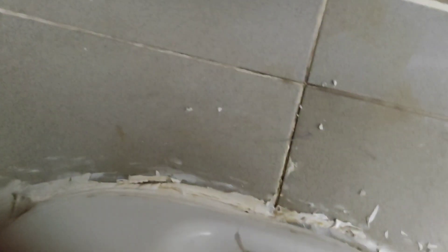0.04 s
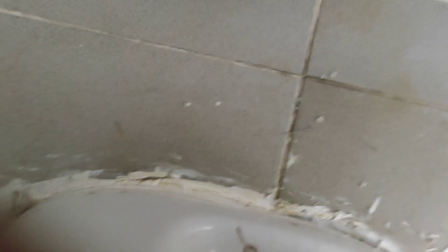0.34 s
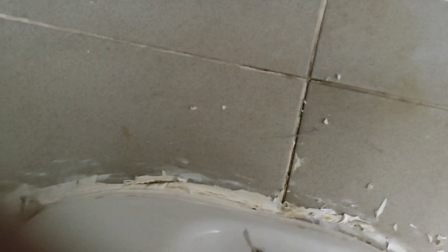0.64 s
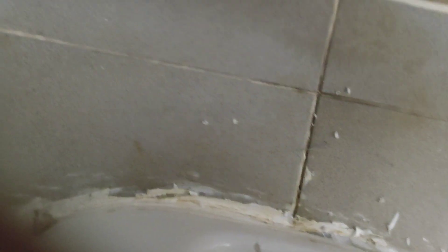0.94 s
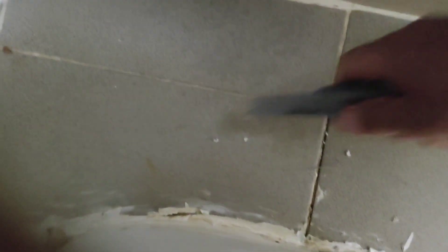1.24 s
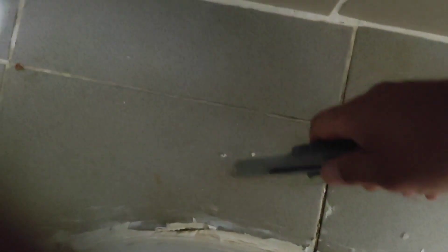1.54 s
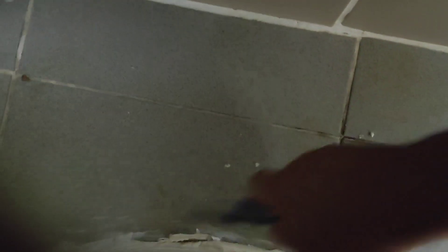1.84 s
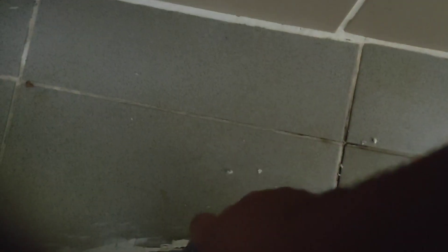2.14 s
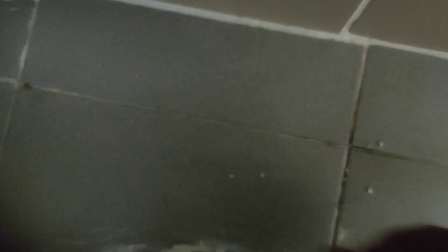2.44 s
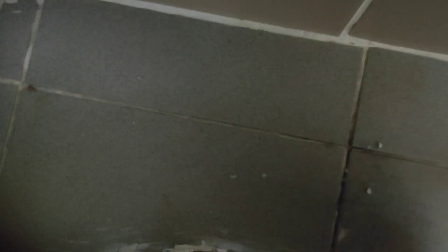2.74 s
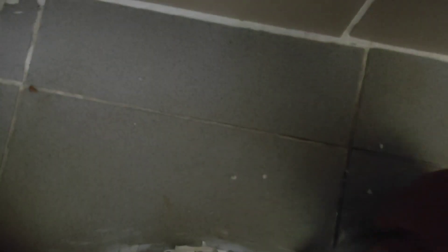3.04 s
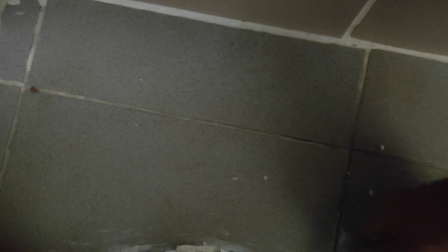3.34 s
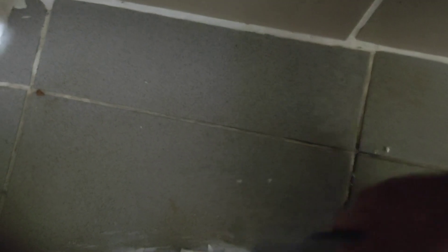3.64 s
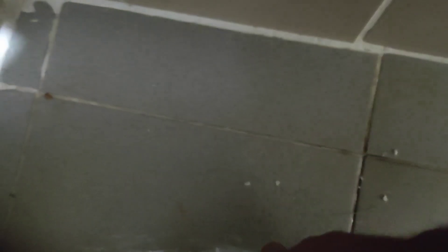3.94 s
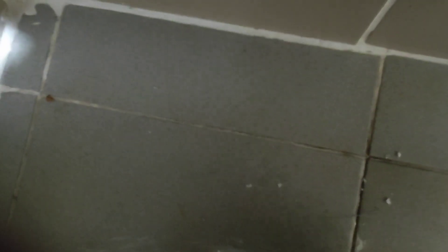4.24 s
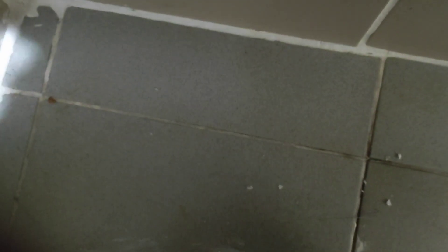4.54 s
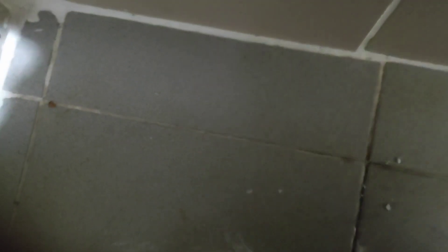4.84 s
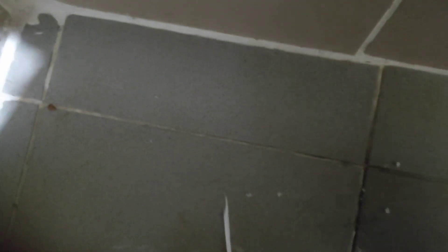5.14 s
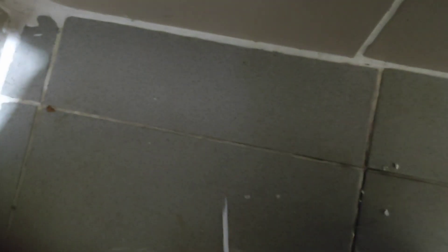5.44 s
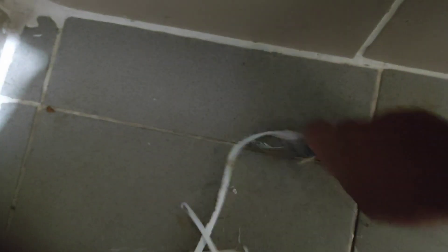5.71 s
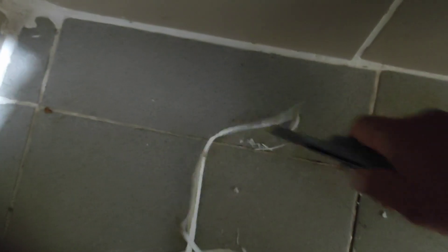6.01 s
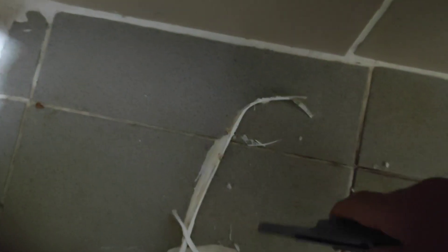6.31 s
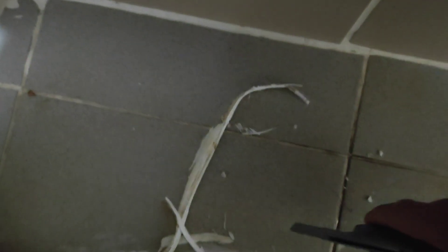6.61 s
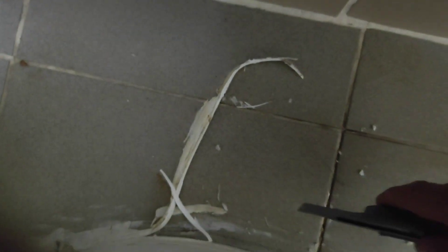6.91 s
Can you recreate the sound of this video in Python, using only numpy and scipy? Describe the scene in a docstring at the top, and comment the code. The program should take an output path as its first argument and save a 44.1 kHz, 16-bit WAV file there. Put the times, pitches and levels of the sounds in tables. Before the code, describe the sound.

Close up in a small tiled bathroom, light ticks and soft scratching grow into irregular, high, raspy scrapes as a metal blade works at old sealant. The blade snags and taps on the tile, now and then squeaking briefly, with some soft low bumps and a faint sleeve rustle. The strokes get busier, peak in three quick, forceful scrapes, then drop to light scratches over quiet room air.

```python
"""A small, hard, tiled bathroom: close to a stereo camera, a steel blade scrapes old sealant off the floor.
In each stroke the edge sticks and slips: it hisses, rasps under pressure and at times squeaks.
In between it catches, jabs and knocks on the tile, among tiny ticks and dull bumps on the floor.
The microphone's resonance colours the hiss near 7.5 kHz. The walls add a short, bright tail;
underneath sit a thin whistle, sleeve rustle, room air and faint hum."""
import sys
import numpy as np
from scipy import signal
from scipy.fft import rfft, irfft, next_fast_len
from scipy.io import wavfile
from scipy.ndimage import uniform_filter1d

SR = 44100
rng = np.random.default_rng(int(sys.argv[2]) if len(sys.argv) > 2 else 0)


def transcribe(u):
    """Save the signal u as a 16-bit wav file named by the first command-line argument.

    u: samples, shape (n,) or (channels, n), limited to [-1, 1]; the rate is SR.
    q: integer samples, one column per channel.
    """
    v = np.clip(np.atleast_2d(u).T, -1, 1)
    q = np.round(v * 32767).astype(np.int16)
    wavfile.write(sys.argv[1], SR, q)


N = 307377

# Left-right likeness of a stroke, a catch and the background: freq_hz, correlation (-1..1)
STROKE_STEREO = [(200, 0.37), (900, 0.01), (5000, -0.11), (6200, 0.4), (7000, 0.95), (8500, 0.97),
                 (11000, .4)]
CATCH_STEREO = [(900, 0.1), (5000, -0.2), (7500, 0.5), (11000, 0.5)]
AIR_STEREO = [(100, 0.92), (500, 0.44), (2000, 0.29), (7500, 0.93)]
# Colour of the ringing steel: freq_hz, density_db
STEEL_COLOUR = [(900, -39), (1400, -18), (2100, 0.5), (2900, 1), (3700, 0), (4500, -1), (5500, 0),
                (6500, -4.5), (9000, -23.5)]


def blade(neutral_hz=7488, crack_db=-18.3):
    """Strokes and catches shake the same steel and tile; a breaking contact adds a bright crack."""
    # The scrape drifts slightly in pitch: time_s, hiss_peak_hz
    hiss_pitch = [(1.7, 7540), (2.26, 7750), (2.35, 7440), (3.73, 7690), (4.12, 7403), (4.3, 7250),
                  (4.49, 7601), (4.6, 7230), (4.66, 7520), (4.95, 7170), (5.08, 7570), (5.8, 7632)]
    crack_colour = [(7000, -24.5), (9500, 4), (15500, -7.5)]  # freq_hz, density_db
    hiss, rasp, rub, drag = scraping()
    snap, chatter, knock, crack = catches()
    stretch = curves(hiss_pitch)[0] / neutral_hz
    top = scraping_hiss(hiss, snap, stretch)
    body = steel_and_tile(rasp, rub, np.hypot(drag, knock), stretch)
    biting = bite(rasp)
    clink = chatter * noise(STEEL_COLOUR, CATCH_STEREO, patchy_db=3)
    return top + body + biting + clink + amp(crack_db) * crack * noise(crack_colour, CATCH_STEREO)


def strokes(swell_db=13.5, release_db_per_s=280.5):
    """Hiss, grate and drag envelopes: in each stroke the hand leans in, holds the push and lets go."""
    # Blade strokes, plus faint background hiss near the start and end (the rows at 0, .64 and 6.2 s):
    # start_s, swell_s, hold_end_s, hiss_db, grate_db, drag_db
    cues = [(0, .017, .5, -67, -71, -69), (.115, .008, .145, -53, -51, -62),
            (.55, .028, 0.6, -59.5, -63.5, -73), (.64, .14, .95, -61, -65, -65),
            (1.1, .11, 1.67, -47.5, -56, -66), (1.6, .15, 2.02, -38, -48, -58),
            (2.03, .03, 2.24, -46.5, -53, -62.5), (2.26, .01, 2.4, -41, -42, -44.5),
            (2.291, .11, 2.565, -26.5, -34, -39.5), (2.64, .018, 2.78, -49, -51, -59),
            (2.99, .012, 3.02, -38, -36, -58), (3.04, .05, 3.1, -31, -35.5, -58.5),
            (3.38, .052, 3.42, -38.5, -39, -56), (3.63, .041, 3.69, -48, -47.5, -69),
            (3.78, .021, 3.97, -44, -50, -65), (4.008, .015, 4.045, -35, -35, -53),
            (4.055, .02, 4.078, -26.5, -31.5, -51), (4.1, .12, 4.285, -19.5, -28, -38),
            (4.36, .02, 4.44, -37.5, -32.5, -41), (4.521, .08, 4.7, -23, -30, -39.5),
            (4.77, .11, 4.964, -28.5, -34, -44.5), (4.9, .038, 4.92, -25.5, -36, -44),
            (4.942, .012, 4.98, -20.5, -33, -43), (4.99, .009, 5.015, -32.5, -37, -46),
            (5.094, .014, 5.17, -33.5, -32.5, -53), (5.215, .02, 5.28, -37.5, -42.5, -58),
            (5.32, .017, 5.5, -41.5, -45, -43.5), (5.437, .014, 5.51, -17.5, -19.5, -42),
            (5.508, .024, 5.6, -16.5, -21.5, -42), (5.605, .018, 5.712, -17.5, -22.5, -38),
            (6.02, .018, 6.1, -55, -64, -75), (6.2, .02, 6.6, -64, -69.5, -74),
            (6.6, .045, 6.6, -55, -58.5, -75)]
    t, power = np.arange(SR) / SR, np.zeros((3, N))
    for start, swell, end, *levels in cues:
        attack_db = swell_db * (np.clip(t / swell, 0, 1) - 1)
        release_db = release_db_per_s * np.maximum(t - (end - start), 0)
        add(power, start, np.outer(amp(levels), amp(attack_db - release_db)) ** 2)
    return np.sqrt(power)


def scraping(slips_per_s=780, slip_t60=.016, sliding=2.2, crumbs_per_s=30, crumb_t60=.012, bite_db=-25):
    """Hiss, rasp, rub and drag envelopes: the edge sticks and slips as the hand judders along the bead."""
    t = np.arange(SR // 50) / SR
    jolts = (rng.random(N) < slips_per_s / SR) * amp(2.2 * rng.standard_normal(N))
    slips = unit(signal.oaconvolve(jolts, fade(t, slip_t60))[:N])
    hand = amp(.9 * wobble(70) + .6 * wobble(22))  # quick judder, slow sway
    # now and then a hard crumb of sealant gives way with a sharper slip
    breaks = (rng.random(N) < crumbs_per_s / SR) * amp(1) * rng.random(N)
    crumbs = signal.oaconvolve(breaks, fade(t, crumb_t60))[:N]
    grain = amp(.34) * unit((slips + sliding) * hand) * unit(np.hypot(1, crumbs))
    hiss, grate, drag = strokes()
    # a light stroke only rubs; under pressure the edge bites and the steel rasps brightly
    load = (grate / amp(bite_db)) ** 2
    rub = grate / np.hypot(1, load)
    return grain * np.array([hiss, rub * load, rub, drag])


def catches(rise_s=.0007, stop_t60=.029, ring_db=-9, ring_t60=.097, knock_t60=.088, pivot_db=-28):
    """Snap, chatter, knock and crack envelopes: the blade snags, stops short and rings on weakly."""
    # Snags of the edge: start_s, length_s, snap_db, knock_db
    snags = [(0.961, .005, -27.5, -62), (0.975, 0.018, -22.5, -48), (2.0083, 0.0058, -14.5, -54),
             (2.126, .008, -41, -59), (2.196, .01, -39, -59), (2.24, 0.0095, -29, -50.5),
             (2.2506, 0.0055, -13, -21), (2.615, 0.0055, -12, -24), (2.843, 0.012, -30.5, -60),
             (2.928, 0.004, -28, -65.5), (2.949, 0.02, -37, -65), (2.978, .003, -22, -55),
             (2.9814, 0.0063, -12, -46), (3.22, 0.015, -35.5, -52), (3.318, .012, -44, -54),
             (3.3555, 0.0023, -11, -49), (3.444, 0.0045, -11.5, -38.5), (3.48, 0.012, -20.5, -42.5),
             (3.7656, 0.006, -10.5, -50), (3.928, 0.011, -35.5, -56), (4.019, 0.0065, -36.5, -52),
             (4.1786, 0.0056, -18.5, -50), (4.232, 0.0018, -23, -48), (4.377, 0.005, -27.5, -40),
             (4.4805, 0.0084, -23.5, -32), (4.7216, 0.007, -15, -25), (4.836, .004, -31.5, -44.5),
             (5.099, 0.01, -30.5, -55.5), (5.218, 0.01, -29.5, -54.5), (5.3172, 0.0064, -16, -27),
             (5.342, 0.0051, -30, -30), (5.424, 0.0092, -31, -45.5), (5.437, 0.0025, -22.5, -43.5),
             (5.72, 0.0044, -15, -39), (5.757, 0.005, -27, -57.5), (5.834, 0.004, -20.5, -36.5),
             (5.943, .005, -42, -62), (5.979, 0.016, -31, -56), (6.26, 0.01, -34, -57),
             (6.366, 0.0073, -43.5, -61)]
    t, blows = np.arange(SR // 5) / SR, np.zeros((4, N))
    for start, length, snap_db, knock_db in snags:
        # with force, the chatter grows more slowly than the snap, the crack faster
        force_db = snap_db - pivot_db
        levels = [snap_db, pivot_db + .81 * force_db, knock_db, pivot_db + 1.16 * force_db]
        after = np.maximum(t - length, 0)
        steel = np.maximum(fade(after, stop_t60), amp(ring_db) * fade(after, ring_t60))
        decay = np.array([steel, steel, fade(after, knock_t60), steel])
        add(blows, start, amp(levels)[:, None] * (1 - np.exp(-t / rise_s)) * decay)
    roughness = unit(amp(1.3 * wobble(1500)))
    return amp(-1.48) * blows * roughness


def scraping_hiss(hiss, snap, stretch):
    """The hiss of strokes and catches, coloured by the microphone's resonance near 7.5 kHz."""
    # Colour of the hiss through the microphone: freq_hz, density_db
    colour = [(3000, -41.5), (5500, -19), (6300, -9), (7000, -1), (7500, 1), (8100, -4), (8800, -9),
              (9400, -20), (10200, -25.5), (11300, -27.5), (13500, -38.5), (15500, -34)]
    sliding = hiss * noise(colour, STROKE_STEREO, patchy_db=4, stretch=stretch)
    return sliding + snap * noise(colour, CATCH_STEREO, patchy_db=4, stretch=stretch)


def steel_and_tile(rasp, rub, tile_force, stretch, steel_db=-4):
    """The body of the scrape: biting steel, a light rub and the lower voice of the tile."""
    # Colours of the rub and the tile: freq_hz, density_db
    rub_colour = [(900, -31.5), (1500, -11.5), (2100, 0.5), (2800, 0.5), (3400, -5.5), (5500, -4),
                  (6500, -12.5), (9000, -24.5)]
    tile_colour = [(80, -30), (300, -5.5), (650, -9), (900, 1.5), (1150, -2), (1450, 3), (2000, -6),
                   (4000, -39.5)]
    layers = [(amp(steel_db) * rasp, STEEL_COLOUR), (rub, rub_colour), (tile_force, tile_colour)]
    return sum(force * noise(colour, STROKE_STEREO, patchy_db=5, size=1024, stretch=stretch)
               for force, colour in layers)


def bite(rasp, gain_db=-2, neutral_hz=2200):
    """A biting blade rasps in one broad resonance, which climbs in the hardest push."""
    # Colour of the resonance at its neutral pitch: freq_hz, density_db
    colour = [(900, -40), (1600, -10), (2200, 0.5), (2700, -4), (3600, -12), (6000, -25.5)]
    # Its glide: time_s, peak_hz
    glide = [(3.1, 2750), (4.25, 2130), (4.66, 2140), (5.455, 2400), (5.49, 3200), (5.56, 3570),
             (5.68, 3750)]
    stretch = curves(glide)[0] / neutral_hz
    return amp(gain_db) * rasp * noise(colour, STROKE_STEREO, patchy_db=4, size=1024, stretch=stretch)


def squeaks(unsteady=.022):
    """For a moment the friction locks onto one rough, wandering tone."""
    # Brief notes of the blade: middle_s, half_width_s, pitch_hz, level_db
    notes = [(.14, .02, 4380, -54), (3.098, 0.014, 2850, -30), (3.094, 0.016, 4130, -35),
             (4.66, 0.05, 2077, -30), (5.167, 0.019, 1010, -38.5), (5.468, 0.014, 2200, -23),
             (5.597, 0.01, 3560, -21), (5.655, 0.045, 905, -33.5)]
    t, out = np.arange(SR // 2) / SR, np.zeros((2, N))
    for middle, width, hz, db in notes:
        pitch = hz * (1 + unsteady * np.array([wobble(350, size=len(t)) for side in range(2)]))
        swell = amp(db) * np.exp(-((t - t.mean()) / width) ** 2 / 2)
        add(out, middle - t.mean(), swell * np.sin(2 * np.pi * np.cumsum(pitch, axis=1) / SR))
    return out


def ticks(sweep_hz=3400, end_hz=750, fall_s=.0017, rise_s=.00194, t60=.02):
    """Tiny ticks, each diving in pitch within a few cycles."""
    # Tick cues: start_s, gain_db
    cues = [(0.287, -41), (0.765, -37.5), (0.823, -34), (0.856, -29), (.944, -39), (3.855, -23)]
    t, out = np.arange(SR // 30) / SR, np.zeros(N)
    phase = 2 * np.pi * np.cumsum(end_hz + sweep_hz * np.exp(-t / fall_s)) / SR
    tick = np.sin(phase) * (1 - np.exp(-t / rise_s)) * fade(t, t60)
    for start, db in cues:
        add(out, start, amp(db) * tick)
    return out


def bumps():
    """Soft weight on the floor rings the low modes; a slow push leaves out the short ones."""
    # Modes of the boom: pitch_hz, level_db, t60_s
    modes = [(88, -16, 0.41), (130, -9.5, 0.15), (169.2, -0.5, 0.29), (309, -5.5, 0.1), (528, -4.5, 0.052)]
    # Dull bumps on the floor: start_s, peak_db, rise_s
    cues = [(0.88, -44, 0.053), (1.787, -28, 0.0033), (2.252, -34, .001), (2.617, -37, .001),
            (3.869, -38.5, .06), (4.805, -37.5, 0.036)]
    t, out = np.arange(SR // 2) / SR, np.zeros(N)
    boom = sum(amp(db) * np.sin(2 * np.pi * hz * t) * fade(t, t60) for hz, db, t60 in modes)
    for start, db, rise in cues:
        ring = boom * (1 - np.exp(-t / rise))
        add(out, start, amp(db) * ring / np.abs(ring).max())
    return out


def tiled_walls(x, t60=.32, build_s=.003):
    """The walls answer with a short, bright tail that changes as hand and camera move."""
    t, out, hop = np.arange(SR // 3) / SR, np.zeros((2, N)), SR // 6
    for i in range(0, N, hop):
        tail = rng.standard_normal((2, len(t))) * fade(t, t60) * (1 - np.exp(-t / build_s))
        piece = x[:, i:i + 2 * hop]
        piece = piece * np.sin(np.pi * np.arange(piece.shape[1]) / (2 * hop))  # crossfade
        add(out, i / SR, signal.fftconvolve(piece, tail / np.linalg.norm(tail[0]), axes=1))
    return out


def lingering(x, t60=1.0, dull_hz=6500):
    """A longer, duller reverberation hangs on between the strokes."""
    lowpass = signal.butter(2, dull_hz, fs=SR, output="sos")
    tail = signal.sosfilt(lowpass, rng.standard_normal((2, SR))) * fade(np.arange(SR) / SR, t60)
    return signal.fftconvolve(x, tail / np.linalg.norm(tail[0]), axes=1)[:, :N]


def whistle(level_db=-70, unsteady=.012, fade_s=.08):
    """A very faint, thin whistle wavers, dips and fades out."""
    # Path of the whistle: time_s, pitch_hz
    glide = [(0, 9200), (.08, 9800), (.24, 9350), (.31, 7600), (.385, 6550), (.45, 7460), (.51, 7700),
             (.63, 7200)]
    pitch = curves(glide)[0] * (1 + unsteady * wobble(500))
    fade_out = np.clip((glide[-1][0] - np.arange(N) / SR) / fade_s, 0, 1)
    return amp(level_db) * fade_out * np.sin(2 * np.pi * np.cumsum(pitch) / SR)


def sleeve(resting_db=-62, half_width_s=.17):
    """The sleeve rustles low, swelling with each move of the arm."""
    # Moves of the arm: middle_s, level_db
    moves = [(1.35, -56), (1.85, -55.5), (2.5, -49), (4.299, -54), (4.85, -47), (6.5, -67.5)]
    # Colour of the cloth: freq_hz, density_db
    colour = [(100, -22.5), (235, -10), (340, 0), (500, -7.5), (900, -18.5), (2000, -38.5), (8000, -70.5)]
    t = np.arange(N) / SR
    motion = sum(amp(db) * np.exp(-((t - middle) / half_width_s) ** 2 / 2) for middle, db in moves)
    return (amp(resting_db) + motion) * noise(colour, AIR_STEREO, patchy_db=6.5, size=2048)


def room_tone(air_db=-56, hum_gain_db=2):
    """Steady room air and a low hum that wavers in level and phase."""
    # Colour of the air: freq_hz, density_db
    air_colour = [(12, -17.5), (27, 2), (52, -18.5), (85, -8), (127, -9.5), (168, -1.5), (205, -18),
                  (350, -21.5), (430, -18), (620, -19.5), (720, -29), (1500, -36.5), (5500, -41),
                  (7600, -30.5), (10000, -52), (16000, -85)]
    # Tones of the hum: pitch_hz, level_db
    tones = [(80.7, -62.5), (166.9, -58), (301.5, -66), (355.3, -69), (629.8, -68.5)]
    t = np.arange(N) / SR
    hum = sum(amp(db + 2.8 * wobble(7.8)) * np.sin(2 * np.pi * hz * t + .8 * wobble(8.9))
              for hz, db in tones)
    return amp(air_db) * noise(air_colour, AIR_STEREO, size=4096) + amp(hum_gain_db) * hum


def noise(colour, stereo, patchy_db=0, size=512, stretch=None):
    """Coloured stereo noise of rms 1; patchy_db makes resonances come and go, stretch bends the pitch."""
    hz = np.fft.rfftfreq(size, 1 / SR)
    shape = (2, len(hz), 2 * N // size + 3)  # mid and side, bins, frames
    bins = rng.standard_normal(shape + (2,), dtype=np.float32).view(np.complex64)[..., 0]
    if patchy_db:
        patches = uniform_filter1d(rng.standard_normal(shape[1:]), size=3, axis=0)
        gain = amp(patchy_db * unit(uniform_filter1d(patches, size=11, axis=1)))
        bins *= gain / np.sqrt(uniform_filter1d(gain ** 2, size=24, axis=0))  # colour moves, power stays
    ratio = 1 if stretch is None else np.take(stretch, np.arange(shape[2]) * size // 2, mode="clip")
    width = np.arccos(np.clip(along(stereo, hz), -1, 1)) / 2
    bins *= amp(along(colour, hz[:, None] / ratio)) * np.array([np.cos(width), np.sin(width)])[..., None]
    mid, side = signal.istft(bins, nperseg=size)[1][:, :N]
    return unit(np.array([mid + side, mid - side]))


def amp(db):
    """Decibels to amplitude."""
    return np.exp(np.asarray(db) * (np.log(10) / 20))


def unit(x):
    """Scale to rms 1."""
    return x / np.sqrt(np.mean(x ** 2) + 1e-20)


def along(points, hz):
    """Interpolate (freq_hz, value) points on a log axis."""
    freqs, values = np.transpose(points)
    return np.interp(np.log(hz + 1), np.log(freqs + 1), values)


def curves(rows):
    """One value per sample for each column after the time."""
    times, *columns = np.transpose(rows)
    return [np.interp(np.arange(N) / SR, times, column) for column in columns]


def wobble(rate, size=N):
    """A random curve with rate knots a second."""
    knots = rng.standard_normal(int(size * rate / SR) + 2)
    return np.interp(np.arange(size) * rate / SR, np.arange(len(knots)), knots)


def fade(t, t60):
    """Decay by 60 dB in t60 seconds."""
    return np.exp(-np.log(1000) * t / t60)


def add(track, start_s, sound):
    """Mix a sound into a track."""
    part = track[..., round(start_s * SR):][..., :sound.shape[-1]]
    part += sound[..., :part.shape[-1]]


def scene(walls_db=-12.5, linger_db=-25):
    """Blade, floor and arm in the tiled room."""
    work = blade() + squeaks()
    reverb = amp(walls_db) * tiled_walls(work) + amp(linger_db) * lingering(work)
    return work + reverb + ticks() + bumps() + whistle() + sleeve() + room_tone()


def record(dry, top_hz=16000):
    """The camera rounds the highest peaks, leans left in the bass and keeps nothing above its band limit."""
    # The low end reaches the left port more strongly: freq_hz, left_minus_right_db
    lean = [(100, 4.5), (300, 6), (850, 6), (1150, 0.5), (2200, 0), (7500, -2), (12000, .4)]
    rounded = dry / (1 + (dry * dry / .7) ** 3) ** (1 / 6)
    size = next_fast_len(N + SR // 10)
    hz = np.fft.rfftfreq(size, 1 / SR)
    balance = amp(np.outer([.5, -.5], along(lean, hz)))
    band_limit = 1 / (1 + (hz / top_hz) ** 120)
    return irfft(rfft(rounded, size) * balance * band_limit, size)[:, :N]


dry = scene()
out = record(dry)
transcribe(out)
```